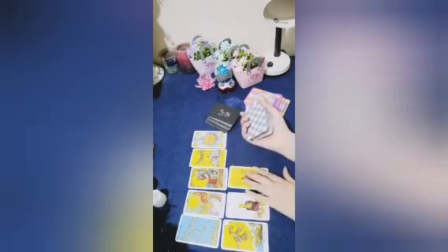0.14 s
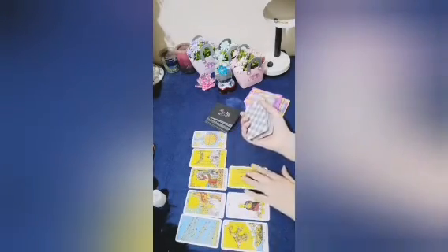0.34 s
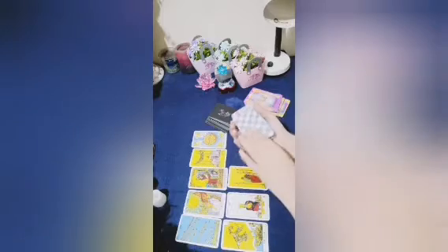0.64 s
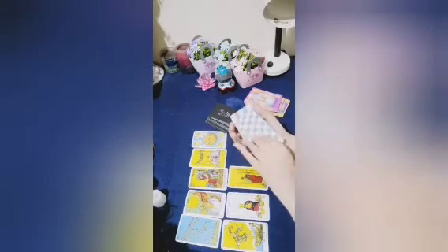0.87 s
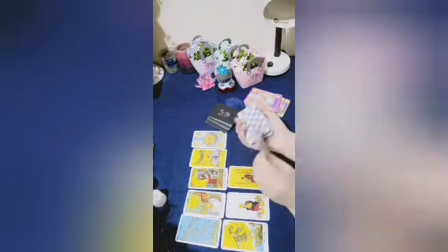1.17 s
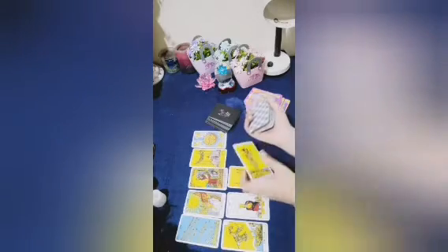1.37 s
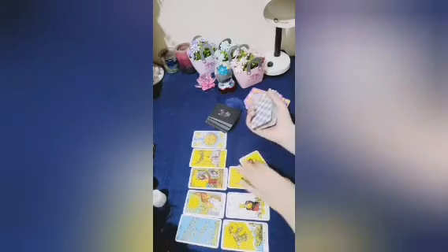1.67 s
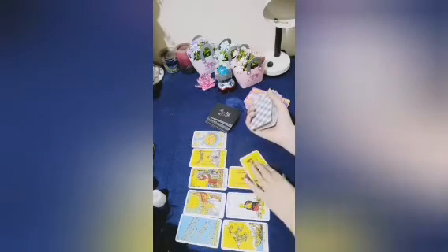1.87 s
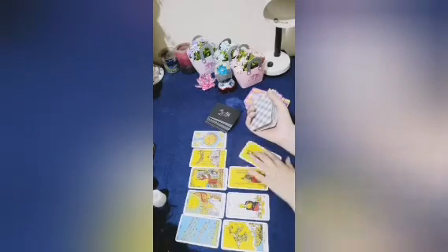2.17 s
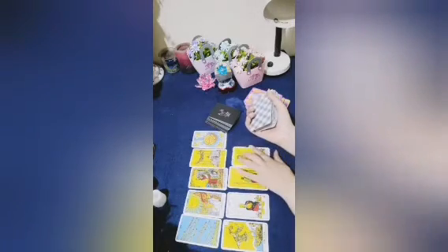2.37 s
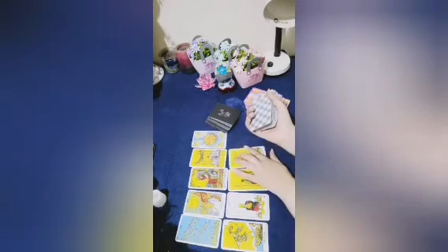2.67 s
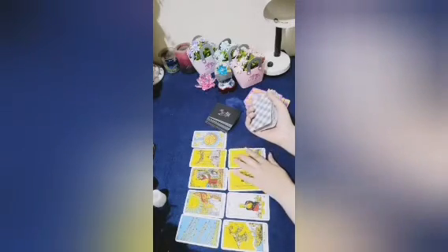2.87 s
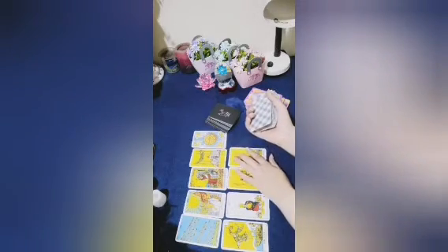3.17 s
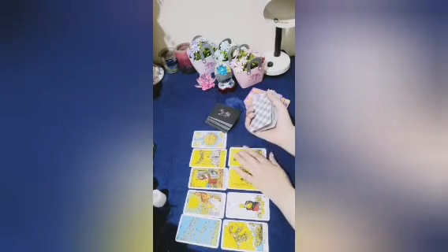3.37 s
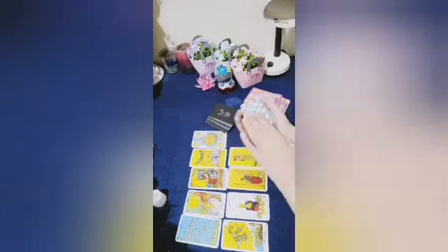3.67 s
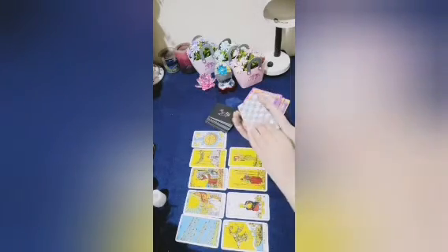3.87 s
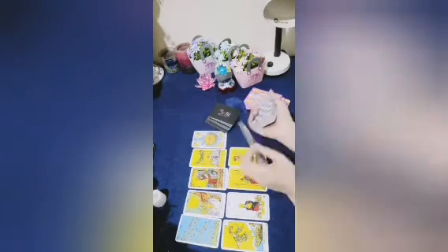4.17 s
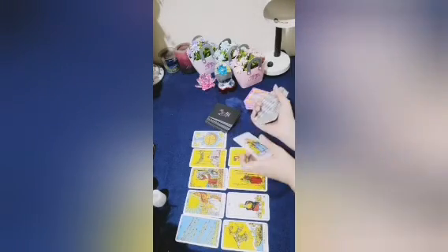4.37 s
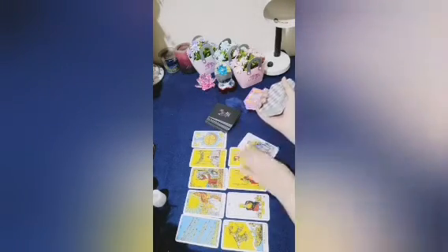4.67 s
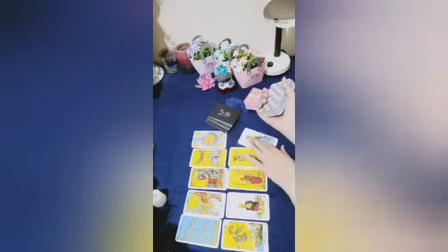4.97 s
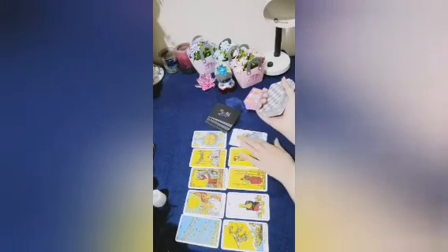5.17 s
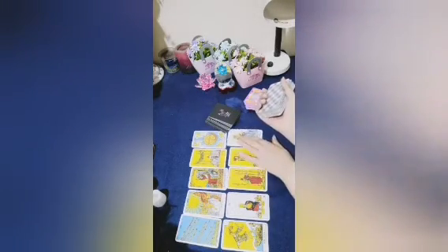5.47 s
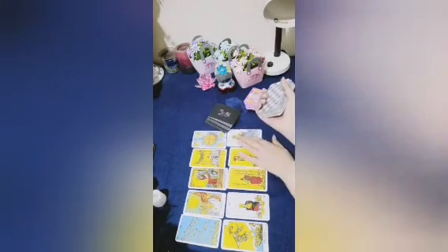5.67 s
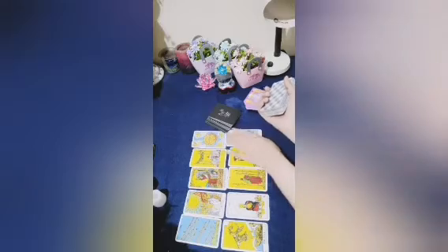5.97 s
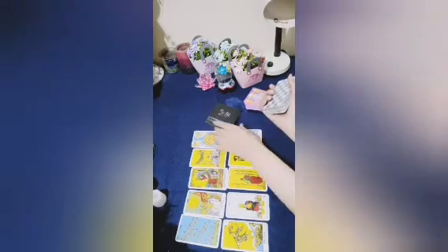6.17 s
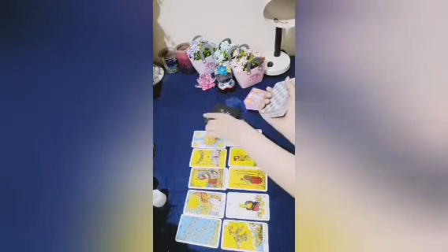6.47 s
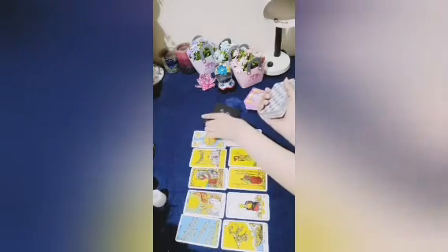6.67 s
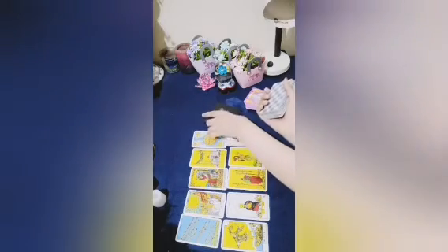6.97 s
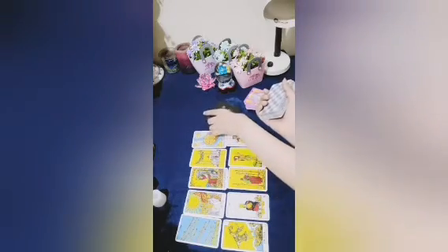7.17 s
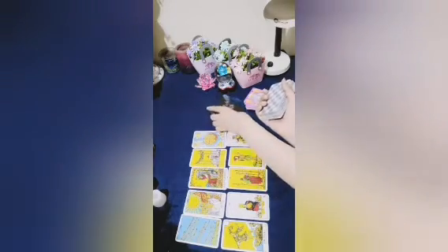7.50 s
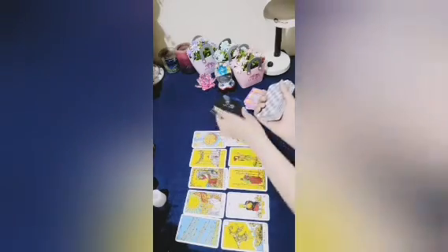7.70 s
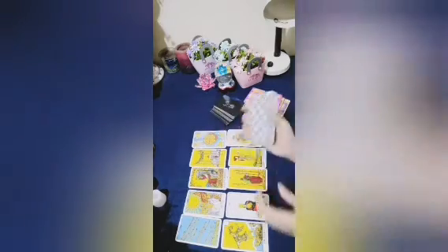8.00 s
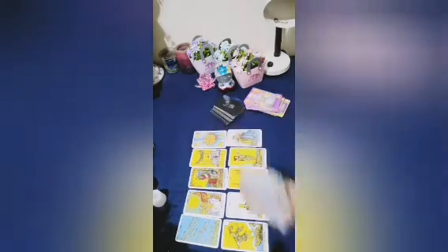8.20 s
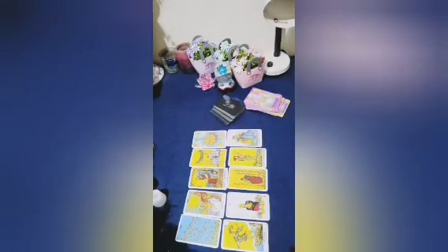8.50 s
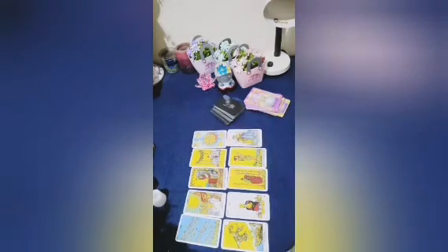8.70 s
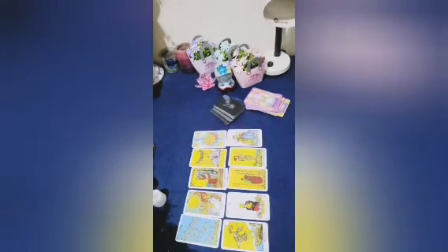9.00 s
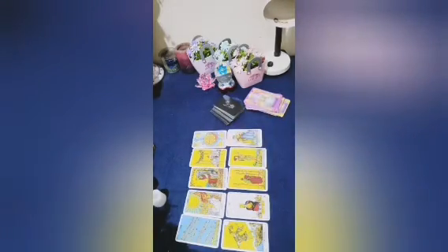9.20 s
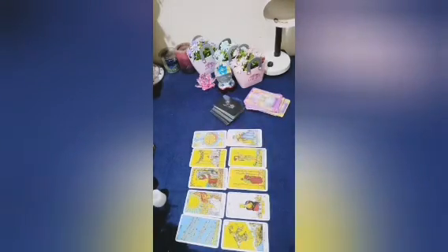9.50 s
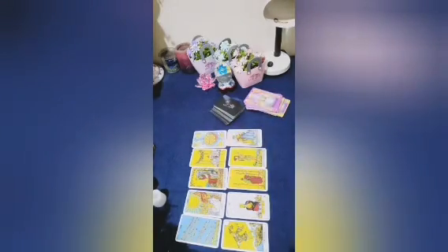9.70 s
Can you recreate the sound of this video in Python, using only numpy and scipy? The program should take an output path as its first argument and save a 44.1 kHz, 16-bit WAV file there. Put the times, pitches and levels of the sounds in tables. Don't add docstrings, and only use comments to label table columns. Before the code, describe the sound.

Throughout, a cooling unit fills a small room with a steady deep hum near 100 Hz, a lower shaft tone that beats slowly and grows after about 3.4 s, soft rushing air, faint whine and a thin, high tick about six times a second, alternating strong and weak. Slight hiss sits on top. From 0.85 s tiny card-edge clicks and dry rubs on cloth appear, a duller scrape at 1.3. A soft tap and sharp snap come at 1.6, another ringing snap at 1.9, then a long slide around 2.2. Faint rubs and clicks return at 3.9-4.6, a snap at 4.9, a long slide at 5.2, small taps at 5.35 and 5.9. Mostly hum until the loudest rub at 8.1. At 8.67 the deck slaps down close, by far the loudest event: airy thump, quick bounces, clatter, ringing table. Soft touches follow at 8.86 and 9.7.

```python
import sys
import numpy as np
from scipy import signal
from scipy.fft import rfft, irfft, next_fast_len
from scipy.io import wavfile
from scipy.ndimage import uniform_filter1d, map_coordinates

SR = 44100
rng = np.random.default_rng(int(sys.argv[2]) if len(sys.argv) > 2 else 0)


def ratio_of_db(decibels):
    return 10 ** (np.asarray(decibels, float) / 20)


def wrap_up_sound(samples):
    columns = np.atleast_2d(samples).T
    tamed = np.clip(columns, -1, 1)
    steps = np.round(tamed * 32767).astype(np.int16)
    wavfile.write(sys.argv[1], SR, steps)


N = 434385

FLIP_S = [
    1.6309,
    1.9133,
    4.8815,
]
# (ring [dB], crack [dB], rattle [s], rattle share [ratio], left minus right [dB])
FLIPS = [
    (-27, -39.5, 0.0042, 0.034, -5.5),
    (-24.5, -51, 0.0038, 0.037, -3),
    (-24.5, -50.5, 0.0056, 0.015, -2),
]
# (time [s], level [dB], ring [Hz], swell [s])
SLAP = [
    (8.6666, -5.5, 1000, 0.0036),
    (8.6722, -5, 330, 0.0009),
    (8.6848, -18, 300, 0.0013),
    (8.7165, -22, 300, 0.002),
]


def unit(x):
    return x / np.sqrt(np.mean(x ** 2) + 1e-20)


def along(points, hz):
    f, v = np.transpose(points)
    return np.interp(np.log(hz + 1), np.log(f + 1), v)


def wobble(rate):
    knots = rng.standard_normal(int(N * rate / SR) + 4)
    return map_coordinates(knots, [np.arange(N) * rate / SR])


def filtered(x, response):
    m = next_fast_len(N + SR // 2)
    return irfft(rfft(x, m) * response(np.fft.rfftfreq(m, 1 / SR)), m)[..., :N]


def band(lo_hz, hi_hz):
    return lambda f: 1 / np.sqrt((1 + (lo_hz / (f + 1)) ** 4) * (1 + (f / hi_hz) ** 8))


def panned(x, db):
    return x * ratio_of_db(np.array([[db / 2], [-db / 2]]))


def add(track, s, x):
    part = track[:, round(s * SR):][:, :x.shape[1]]
    part += x[:, :part.shape[1]]


def room(x):
    # (frequency [Hz], t60 [s])
    decay = [(100, 1), (1000, 0.53), (4000, 0.22), (12000, 0.38)]
    hz, t, z = signal.stft(rng.standard_normal((2, SR // 2)), SR, nperseg=256)
    fade = ratio_of_db(-60 * t / along(decay, hz)[:, None])
    tail = signal.istft(z * fade, SR, nperseg=256)[1]
    return signal.fftconvolve(np.pad(x, ((0, 0), (200, 0))), tail / np.linalg.norm(tail[0]), axes=1)


def rumble():
    noise = rng.standard_normal(N) + 0.5 * rng.standard_normal((2, N))
    return ratio_of_db(-64) * unit(filtered(noise, lambda f: band(40, 55)(f) ** 2))


def air():
    # (frequency [Hz], level [dB per Hz])
    rush = [(65, -30), (110, -3), (127, -8), (167, -15.5), (287, -14.5), (405, -21), (512, -16),
            (1750, -29.5), (2800, -32.5), (3120, -37), (3420, -37), (4410, -44), (7580, -49.5), (8300, -59),
            (10800, -85), (18300, -120)]
    # (frequency [Hz], width [Hz], lift [dB])
    ducts = [(126.6, 25, -6), (244.5, 12.9, 10), (287.5, 8.7, 5.5), (492, 30, -3)]
    # (frequency [Hz], correlation [-1..1])
    alike = [(60, 0.27), (130, 0.87), (290, 0.86), (630, 0.24), (1390, -0.024), (3040, -0.21), (6660, 0.6),
             (14600, 0.94)]
    # (frequency [Hz], left minus right [dB])
    lean = [(60, 0.5), (110, -11.5), (200, -2.5), (370, 0), (690, -2.5), (1270, -2.5), (2340, -1.5),
            (4300, -4), (7920, -4), (14600, -3)]

    def colour(f):
        lift = sum(ratio_of_db(db) / (1 + (2 * (f - centre) / width) ** 2) for centre, width, db in ducts)
        thinning = band(100, 20000)(f) ** 3 + ratio_of_db(-17)
        return ratio_of_db(along(rush[1:], f)) * (1 + lift) * thinning

    def mid_side(f):
        angle = np.arccos(np.clip(along(alike, f), -1, 1)) / 2
        return colour(f) * [np.cos(angle), np.sin(angle)]

    z = signal.stft(rng.standard_normal((2, N)), nperseg=512)[2]
    patches = uniform_filter1d(rng.standard_normal(z.shape[1:]), 6, 0)
    patches = unit(uniform_filter1d(patches, 10, 1))
    pair = signal.istft(z * ratio_of_db(0.64 * patches), nperseg=512)[1][:, :N]
    mid, side = filtered(pair, mid_side)
    ports = filtered(np.array([mid + side, mid - side]), lambda f: ratio_of_db(along(lean, f) * [[0.5], [-0.5]]))
    return ratio_of_db(-43 + 0.1 * wobble(1.445)) * ports / np.sqrt(np.mean(ports.mean(0) ** 2))


def motor():
    # (multiple of mains hum [ratio], level [dB], unsteadiness [dB])
    partials = [
        (1, 0, 0.3),
        (2, -28, 1),
        (3, -19.5, 2),
    ]
    # (frequency [Hz], level [dB rms])
    whine_lines = [(2202, -77), (2740, -77), (2891, -81), (3278, -83), (3332, -78), (3381, -82),
                   (3478, -79), (3623, -82), (3671, -82), (3822, -82), (4161, -85), (4603, -88),
                   (4936, -81), (5184, -90), (5227, -90), (5475, -89), (5819, -87), (5862, -87),
                   (6304, -93), (7235, -90), (7381, -90), (12898, -98)]
    mains_hz, shaft_hz, beat_hz = 100.11, 48.96, 1.5
    idle_db, load_db, fan_db = -57.5, 6.5, -65
    load_s, load_rise_s = 3.4, 0.34
    beat_dip_s = 1.04
    t = np.arange(N) / SR
    turn = 2 * np.pi * t
    hum = sum(ratio_of_db(db + loose * wobble(3)) * np.cos(k * (mains_hz * turn + 2.5)) for k, db, loose in partials)
    hum = ratio_of_db(-35.5 + 0.5 * wobble(6.5)) * hum

    phase = shaft_hz * turn + 0.093 * wobble(0.73)
    shaft_db = idle_db + load_db / (1 + np.exp((load_s - t) / load_rise_s)) + 0.8 * wobble(2.02)
    shaft = ratio_of_db(shaft_db) * np.cos(phase)
    fan = ratio_of_db(fan_db) * np.cos(phase - 2 * np.pi * beat_hz * (t - beat_dip_s))

    drift = 0.0015 * np.cumsum(wobble(1)) / SR
    whine = np.zeros((2, N))
    for hz, db in whine_lines:
        start = rng.uniform(0, 7) + rng.uniform(-1, 1, (2, 1))
        whine += ratio_of_db(db + 1.5 + 2 * wobble(4)) * np.cos(hz * (turn + drift) + start)
    return np.sqrt(2) * (panned(hum + shaft - fan, -5.0) + whine)


def ticking():
    # (frequency [Hz], level [dB])
    tick_colour = [(5000, -46), (7000, 0), (8500, -11), (9700, -2), (11000, -15), (14000, -26),
                   (15500, -40)]
    turn_s, first_s = 0.31387, 0.132
    k = np.arange(int(2 * N / SR / turn_s))
    luck = rng.standard_normal((len(k), 2))
    jitter = np.where(k % 2, 0.006, 0.002) * luck[:, 0]
    at = first_s + k * turn_s / 2 + jitter
    strength = ratio_of_db(-5 * (k % 2) + 1.4 * luck[:, 1])
    strikes = np.bincount((at * SR).astype(int), strength, N + SR)[:N]
    t = np.arange(SR // 8) / SR
    shape = (1 - np.exp(-t / 0.0044)) * (ratio_of_db(-60 * t / 0.026) + 0.32 * ratio_of_db(-60 * t / 0.26))
    noise = unit(filtered(rng.standard_normal(N), lambda f: ratio_of_db(along(tick_colour, f))))
    return panned(ratio_of_db(-59) * noise * signal.fftconvolve(strikes, shape)[:N], -1.5)


def slides():
    # (time of most pressure [s], rise [s], hiss level [dB], brightness [dB])
    strokes = [
        (1.06, 0.1, -72, 13),
        (1.14, 0.05, -72, -3),
        (1.28, 0.099, -66.5, -9),
        (2.22, 0.24, -67, 3),
        (4.06, 0.19, -75, 11),
        (4.21, 0.02, -68, 4),
        (4.52, 0.04, -66.5, 0),
        (5.2, 0.32, -69.5, -1),
        (8.08, 0.093, -63.5, -2),
        (8.17, 0.1, -86, 11),
    ]
    t = np.arange(N) / SR
    grain = rng.standard_normal(N) * ratio_of_db(2.1 * wobble(300) + 2.6 * wobble(25))
    grain = grain + 0.5 * rng.standard_normal((2, N))
    hiss = unit(filtered(grain, band(4500, 3800)))
    sheen = unit(filtered(grain, band(7500, 9000)))
    scrape = unit(filtered(grain, band(1610, 1950)))

    moves = []  # (gain curve, brightness dB)
    for s, rise, db, bright in strokes:
        u = np.clip(1 + (t - s) / rise, 0, None)
        moves.append((ratio_of_db(db) * (u * np.exp(1 - u)) ** 2, bright))
    for s, (_, crack_db, *_) in zip(FLIP_S, FLIPS):
        moves.append(((t > s) * ratio_of_db(crack_db - 17.5 - 60 * np.abs(t - s) / 0.28), 7))

    out = np.zeros((2, N))
    for gain, bright in moves:
        out += gain * hiss
        out += gain * ratio_of_db(-6 + bright) * sheen
        out += gain * ratio_of_db(-3 - 0.7 * bright) * scrape
    return out


def pat(db, hz, swell, t):
    u = t - swell - np.array([[0.00016], [0]])
    return ratio_of_db(db) * np.exp(-(u / (0.45 * swell)) ** 2) * np.cos(2 * np.pi * hz * u)


def taps():
    # (time [s], level [dB], ring [Hz], swell [s])
    touches = [
        (1.596, -35, 613, 0.003),
        (5.352, -42, 540, 0.0019),
        (5.897, -40, 700, 0.0022),
        (8.864, -30, 620, 0.0052),
        (8.864, -31.5, 1040, 0.00408),
        (9.702, -38, 680, 0.0061),
        (9.719, -41, 520, 0.0064),
    ]
    out, t = np.zeros((2, N)), np.arange(SR // 20) / SR
    for s, db, hz, swell in touches:
        hit = panned(pat(db + 0.5, hz, swell, t), -2.5)
        add(out, s - swell / 2, hit)
        add(out, s, ratio_of_db(-4) * room(hit))
    return out


def snap(modes, db, crack_db, rattle, share, pan_db, slip=0.00013):
    t = np.arange(SR // 20) / SR
    ring = -sum(ratio_of_db(level - 60 * t / t60) * np.sin(2 * np.pi * hz * t) for hz, level, t60 in modes)
    ring = ring * (1 - np.exp(-(t / slip) ** 2))
    shake = rng.standard_normal((3, len(t))) * np.exp(-(t / rattle) ** 4)
    flutter = share * np.array([np.convolve(shake[0] + 0.48 * own, ring)[:len(t)] for own in shake[1:]])
    bright = signal.butter(2, [5500, 10500], "band", fs=SR, output="sos")
    crack = signal.sosfilt(bright, shake[0] + 0.49 * shake[1:])
    hit = panned(ratio_of_db(db) * (ring + flutter) + ratio_of_db(crack_db) * crack, pan_db)
    heard = ratio_of_db(-7) * room(hit)
    add(heard, 0, hit)
    add(heard, 0.0103, ratio_of_db(-16) * hit[::-1])
    return heard


def snaps():
    # (frequency [Hz], level [dB], t60 [s])
    flex = [
        [(1130, -6, 0.02), (2720, -4, 0.014), (2870, -4, 0.012), (3180, -2, 0.012), (3980, -8, 0.01),
         (5450, -6, 0.01), (8400, -13, 0.006)],
        [(2400, -4, 0.003), (2950, -1, 0.005), (3620, -4, 0.009), (4700, -7, 0.003), (7600, -12, 0.006)],
        [(2800, -5, 0.008), (3200, 0, 0.009), (3750, -4, 0.006), (5600, -14, 0.003)],
    ]
    slip_s = [
        0.00015,
        0.00013,
        0.00033,
    ]
    # (time [s], ring [dB], ring [Hz], crack [dB], left minus right [dB])
    edges = [(0.8644, -45, 2100, -72, -1.5), (0.9124, -51, 2100, -63, -2.5), (1.1418, -43, 2090, -66, -2.0),
             (1.299, -47, 2580, -65, 0.0), (3.8886, -49, 2220, -63, -9), (4.201, -50, 2060, -56, -8),
             (4.502, -51, 2580, -68, -3.0), (4.5965, -48, 2800, -56.5, -1.0),
             (5.3894, -48, 2550, -71, -1.0), (8.835, -41, 2130, -82, 0.5), (0.8525, -52, 2550, -72, 0.5),
             (1.245, -47, 2050, -70, -2)]
    # (ratio to ring [ratio], level [dB], t60 [s])
    card = [(0.99, -1.5, 0.0073), (2.3, -6, 0.004), (0.52, -35, 0.0027), (1.98, -14, 0.0021)]
    out = np.zeros((2, N))
    for s, row, modes, slip in zip(FLIP_S, FLIPS, flex, slip_s):
        add(out, s, snap(modes, *row, slip))
    for s, db, hz, crack_db, pan_db in edges:
        modes = [(ratio * hz, level, t60) for ratio, level, t60 in card]
        add(out, s, snap(modes, db - 2, crack_db + 2.5, rattle=0.007, share=0.15, pan_db=pan_db))
    return out


def slap():
    # (frequency [Hz], level [dB], t60 [s])
    table_modes = [(89, -22.5, 0.4), (134, -25.5, 0.12), (183.5, -30, 0.25), (243.4, -17.5, 0.168),
                   (309, -20, 0.17), (370, -21, 0.23), (583, -21, 0.089), (1004, -29, 0.3),
                   (1515, -19.5, 0.056), (2070, -21, 0.051)]
    # (frequency [Hz], level [dB per Hz])
    knocks = [(290, -36), (500, -17), (807, -4), (1010, -13), (1340, -11.5), (1480, -12), (1700, -9.5),
              (6140, -31.5), (7370, -29), (14500, -56)]
    out, t = np.zeros((2, N)), np.arange(SR // 2) / SR
    for s, db, hz, swell in SLAP:
        hit = panned(pat(db, hz, swell, t), -5.5)
        add(out, s, hit)
        add(out, s, ratio_of_db(-8.5) * room(hit))

    ring = np.zeros((2, len(t)))
    for hz, db, t60 in table_modes:
        phase = rng.uniform(-0.69, 0.93, (2, 1))
        ring += ratio_of_db(db - 60 * t / t60) * np.sin(2 * np.pi * hz * t + phase)

    noise = rng.standard_normal(N) + 1.8 * rng.standard_normal((2, N))
    noise = unit(filtered(noise, lambda f: ratio_of_db(along(knocks, f))))[:, :len(t)]
    burst = noise * ratio_of_db(-17 - 60 * t / 0.02)
    dull = signal.sosfilt(signal.butter(1, 1800, fs=SR, output="sos"), noise)
    settling = dull * ratio_of_db(-24 - 60 * t / 0.41 + 2.7 * wobble(65)[:len(t)])
    clatter = (burst + settling) * (1 - np.exp(-(t / 0.0011) ** 2))
    add(out, SLAP[0][0], panned(clatter, -1.9))
    add(out, SLAP[1][0], panned(ring * (1 - np.exp(-t / 0.0052)), -1.5))
    return out


def scene():
    return rumble() + air() + motor() + ticking() + slides() + taps() + snaps() + slap()


def ducking():
    dip_db, attack_s, hold_s, recover_s = -1, 0.039, 0.16, 1
    late = np.clip(np.arange(N) / SR - SLAP[0][0], 0, None)
    recovery = np.exp(-np.clip(late - hold_s, 0, None) / recover_s)
    return ratio_of_db(dip_db * (1 - np.exp(-late / attack_s)) * recovery)


def roll_off(x):
    return signal.sosfilt(signal.butter(12, 15190, fs=SR, output="sos"), x)


def record(dry):
    # (frequency [Hz], level [dB per Hz])
    hiss_colour = [(5000, -35), (8300, -5.5), (9500, -6), (11500, -10), (13400, -14), (14700, -17),
                   (15300, -15)]
    noise = rng.standard_normal(N) + 0.54 * rng.standard_normal((2, N))
    hiss = ratio_of_db(-76.5) * unit(filtered(noise, lambda f: ratio_of_db(along(hiss_colour, f))))
    mix = filtered(ducking() * (dry + hiss), lambda f: f < 15150)
    return roll_off(mix)


dry = scene()
out = record(dry)
wrap_up_sound(out)
```